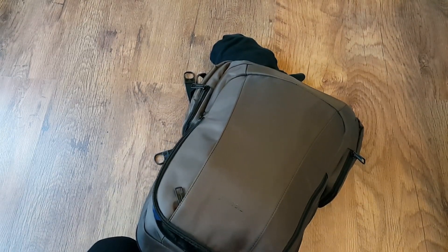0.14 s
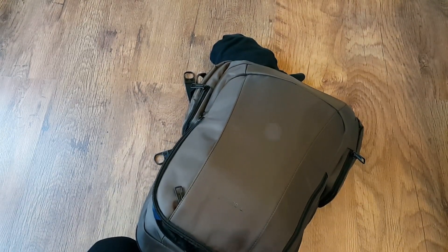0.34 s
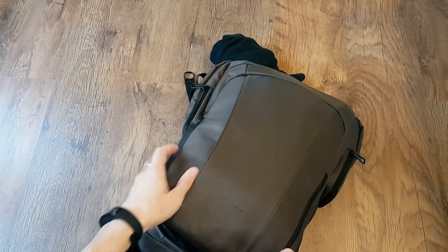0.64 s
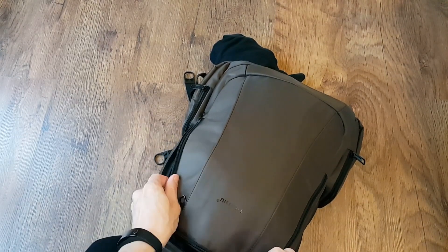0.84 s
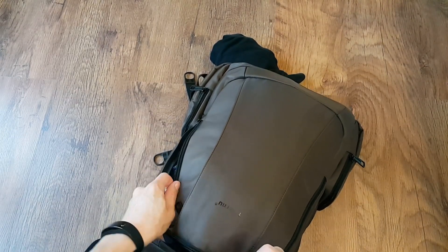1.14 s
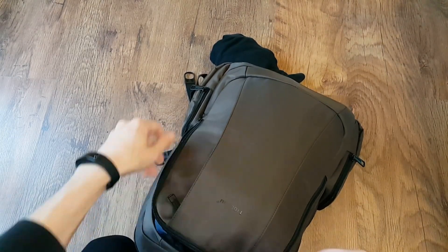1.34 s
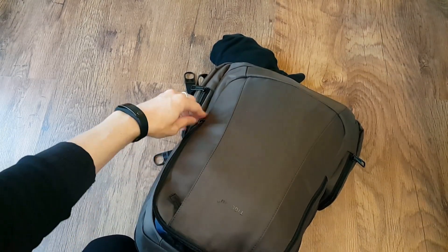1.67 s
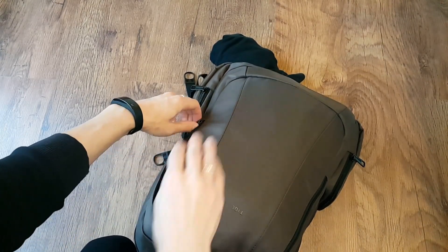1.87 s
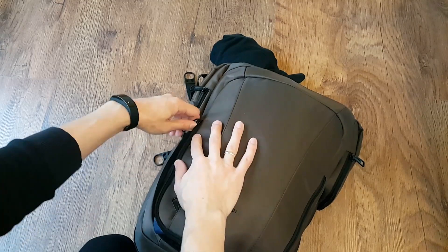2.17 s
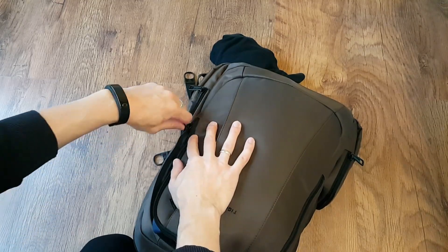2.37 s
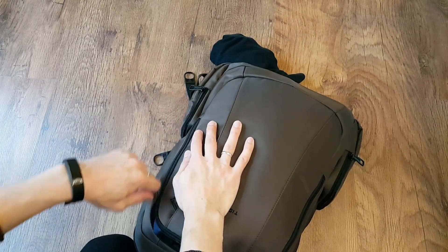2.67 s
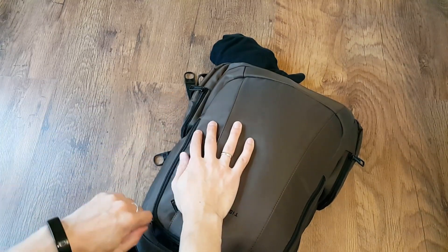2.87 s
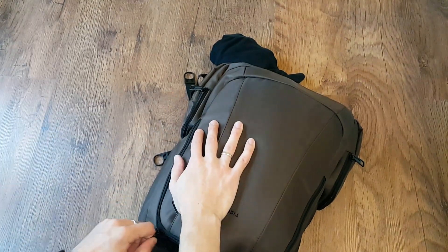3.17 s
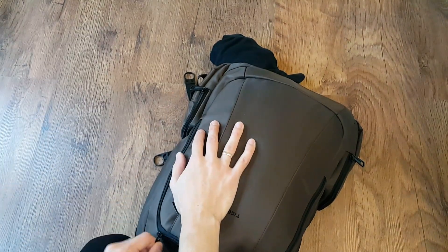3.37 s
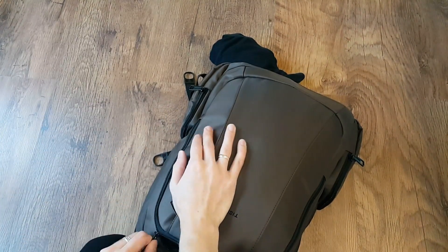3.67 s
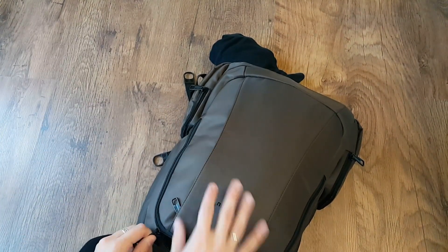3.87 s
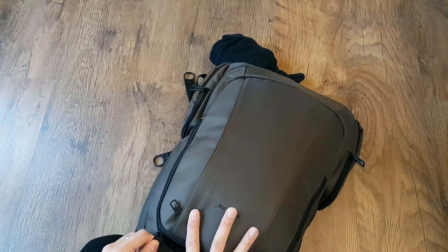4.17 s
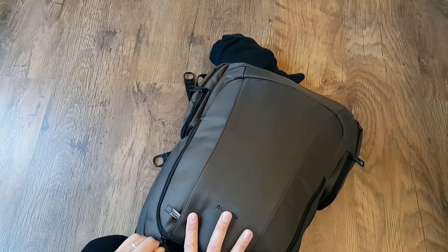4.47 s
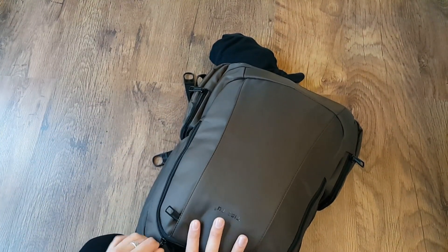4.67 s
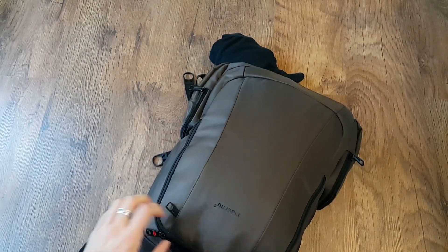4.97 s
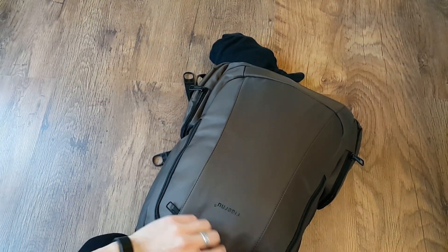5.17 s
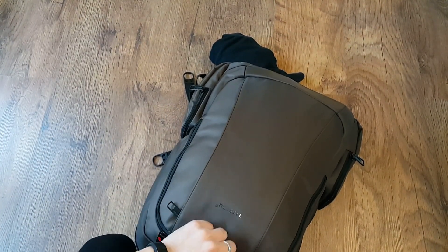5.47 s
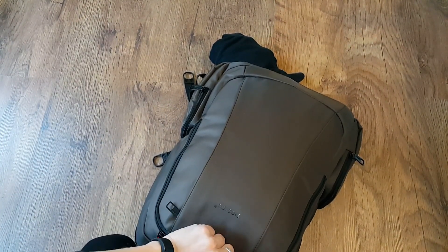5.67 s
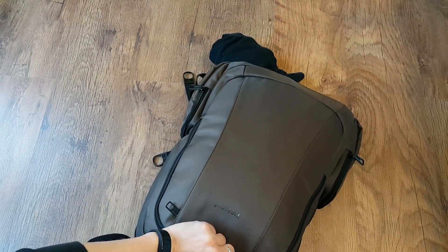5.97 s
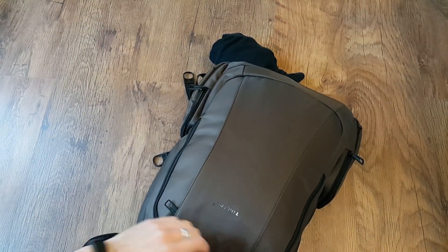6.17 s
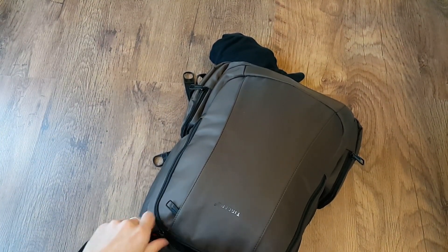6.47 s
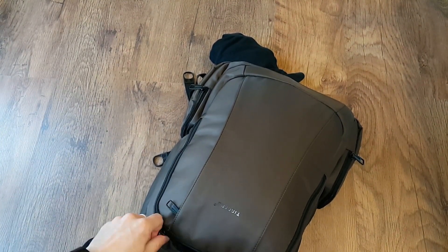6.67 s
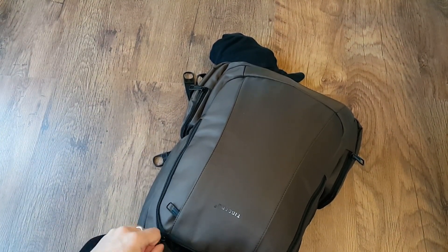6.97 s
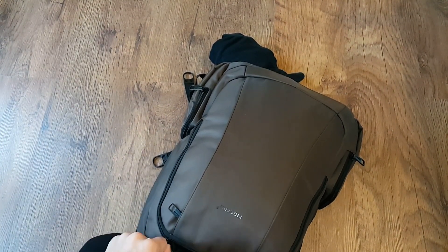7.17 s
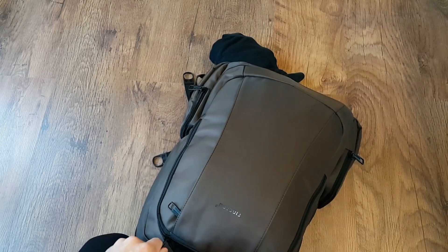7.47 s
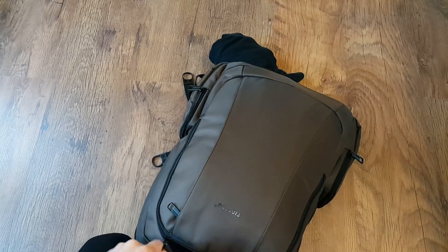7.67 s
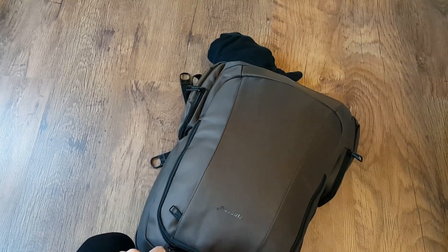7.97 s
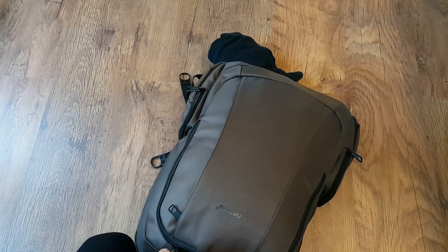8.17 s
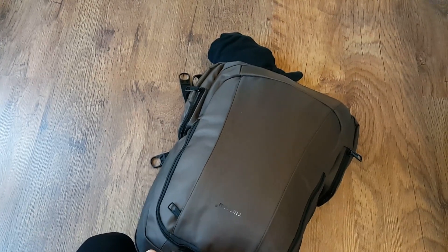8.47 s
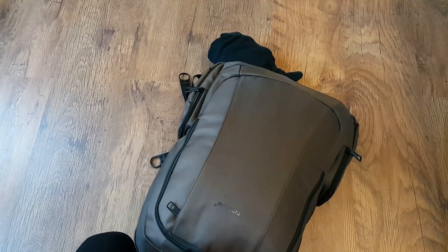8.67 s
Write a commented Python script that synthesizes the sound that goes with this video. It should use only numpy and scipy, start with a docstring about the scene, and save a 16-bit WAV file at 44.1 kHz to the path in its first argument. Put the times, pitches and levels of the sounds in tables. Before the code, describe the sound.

Hands brush and tap a full backpack, then its zipper buzzes in one quick pull and clicks shut in small halting tugs.

```python
"""Zipping a packed backpack shut

In a small room the slider advances in short tugs; one long pull buzzes in two surges, then tugs follow again.
Each tooth is a noise click that rings damped modes of panel, contents and rim, brighter the tauter the bag.
Hands brush the cloth (filtered noise) and bump its folds; pull tabs tick and jingle (clicks and modes).
One fingernail squeak (falling sine), a slap echo, diffuse reverberation and quiet air complete the scene.
"""
import sys
import numpy as np
from scipy import signal
from scipy.fft import rfft, irfft
from scipy.io import wavfile
from scipy.ndimage import uniform_filter1d

SR = 44100
rng = np.random.default_rng(int(sys.argv[2]) if len(sys.argv) > 2 else 0)


def persist_wave(psi):
    """Save psi, clipped to +-1, as 16-bit WAV."""
    counts = np.round(np.clip(psi, -1, 1) * 32767).astype(np.int16)
    wavfile.write(sys.argv[1], SR, np.atleast_2d(counts).T)


N = 389844
TIME_S = np.arange(N) / SR

# damped modes of the bag's contents: f/Hz, level/dB, t60/s
CONTENTS_MODES = [(125.8, -1.5, 0.16), (206.5, 3.5, 0.055)]
# spectrum of a tooth click: f/Hz, density/(dB per Hz)
TOOTH_SPECTRUM = [(300, -4), (1100, 4.5), (2700, -1), (3700, -4.5), (5300, -4), (7800, -17.5), (16000, -60)]
# spectrum of a fingertip or tab tick: f/Hz, density/(dB per Hz)
TAP_SPECTRUM = [(300, -30), (900, 1), (2600, 4), (4700, 3), (6500, -15), (16000, -55)]
# spectrum of a click's bright edge: f/Hz, density/(dB per Hz)
EDGE_SPECTRUM = [(2000, 2.5), (7500, -8.5), (10500, -3), (16000, -8)]
# hand sliding on the cloth: middle t/s, half length/s, relative level/dB
CLOTH_STROKES = [(0.482, 0.076, -71), (0.745, 0.0452, -65.5), (0.985, 0.08, -62), (1.647, 0.22, -73),
                 (2.266, 0.047, -62.5), (3.985, 0.042, -68), (4.205, 0.053, -67.5), (4.97, 0.14, -69),
                 (5.331, 0.057, -67), (5.446, 0.026, -62), (5.657, 0.086, -72.5), (6.328, 0.03, -69.5),
                 (6.743, 0.022, -65), (7.502, 0.029, -66)]


def from_db(db):
    """Decibels to gain."""
    return 10 ** (np.asarray(db) / 20)


def in_time(rows):
    """Columns of a curve, interpolated at every sample."""
    s, *columns = np.transpose(rows)
    return [np.interp(TIME_S, s, column) for column in columns]


def at_hz(points, hz):
    """Table value, interpolated along log frequency."""
    f, value = np.transpose(points)
    return np.interp(np.log(np.maximum(hz, 1)), np.log(f), value)


def colour(x, spectrum, size=4096):
    """Causal minimum-phase filter of unit energy with the given spectrum."""
    log_gain = np.log(from_db(at_hz(spectrum, np.fft.rfftfreq(size, 1 / SR))))
    cepstrum = irfft(log_gain)
    # fold the cepstrum onto positive time
    cepstrum[1:size // 2] *= 2
    cepstrum[size // 2 + 1:] = 0
    response = irfft(np.exp(rfft(cepstrum)))
    response /= np.linalg.norm(response)
    return signal.oaconvolve(np.atleast_2d(x), [response], axes=1)[:, :N]


def clicks(s, db):
    """One impulse per event."""
    out = np.zeros(N)
    index = np.clip(np.round(np.asarray(s) * SR).astype(int), 0, N - 1)
    np.add.at(out, index, from_db(db))
    return out


def strike(s, db, modes, spread_db, detune, pitch=1, tilt_db=0):
    """Each blow rings damped modes with random strengths and detuning; tilt_db is per octave."""
    hz, level_db, t60_s = np.transpose(modes)[:, :, None]
    t = TIME_S[:int(t60_s.max() * SR)]
    fade = from_db(level_db - 60 * t / t60_s)
    octaves = np.log2(hz) - np.log2(hz).mean()
    chance = rng.standard_normal((len(s), 2, len(hz), 1))
    blows = np.broadcast_arrays((s * SR).astype(int), db, pitch, tilt_db)
    out = np.zeros(N + len(t))
    for at, blow_db, factor, tilt, (strength, stretch) in zip(*blows, chance):
        mode_hz = hz * factor * np.exp(detune * stretch)
        gain = from_db(blow_db + tilt * octaves + spread_db * strength)
        rings = gain * fade * np.sin(2 * np.pi * mode_hz * t)
        # neighbouring modes swing in opposition
        out[at:at + len(t)] += rings[::2].sum(axis=0) - rings[1::2].sum(axis=0)
    return out[:N]


def stereo_noise(side_db):
    """White noise; side_db is the left-right difference relative to the common part."""
    mid, side = rng.standard_normal((2, N))
    return mid + from_db(side_db) * side * [[1], [-1]]


def crack(s, db, spectrum, fade_s, side_db, snap_db=-30):
    """A contact: one sharp snap plus a burst of tiny slips decaying with time constant fade_s."""
    snaps = clicks(s, db)
    power = signal.lfilter([1], [1, -np.exp(-2 / (fade_s * SR))], snaps ** 2 + 1e-24)
    slips = np.sqrt(power) * stereo_noise(side_db)
    snap_gain = from_db(snap_db) * np.sqrt(fade_s * SR / 2)
    return colour(slips + snap_gain * snaps, spectrum)


def bag(s, panel_db, thump_db, rim_db, spread_db):
    """A jolt rings the panel, brighter the tauter it is, thumps the contents and reaches the stiff rim."""
    # front panel modes: f/Hz, level/dB, t60/s
    panel_modes = [(307, 1.5, 0.073), (431, 2.5, 0.04), (590, 2, 0.036), (783, -2, 0.027)]
    # stiff rim modes: f/Hz, level/dB, t60/s
    rim_modes = [(1051, -0.5, 0.013), (1266, 1, 0.0077)]
    taut_tilt = 0.12  # dB per octave for each dB of rim over thump
    tilt_db = taut_tilt * (rim_db - thump_db)
    panel = strike(s, panel_db, panel_modes, spread_db, detune=0.058, tilt_db=tilt_db)
    thump = strike(s, thump_db, CONTENTS_MODES, spread_db, detune=0.13)
    rim = strike(s, rim_db, rim_modes, spread_db, detune=0.11)
    return panel + thump + rim


def slack_bag(s, db):
    """A light touch on the bag while nothing stretches it: fixed thump and rim relative to the panel."""
    return bag(s, db, thump_db=db - 2.5, rim_db=db + 3, spread_db=3.5)


def air():
    """The room's quiet air: steady coloured noise."""
    # air spectrum: f/Hz, density/(dB per Hz)
    air_spectrum = [(25, -24), (55, -6.5), (125, -7.5), (400, -8.5), (800, -16.5), (5000, -27), (8000, -35),
                    (15000, -30.5)]
    return from_db(-68) * colour(stereo_noise(side_db=-4.0), air_spectrum)


def tug_teeth():
    """Each tug drags a few near-evenly spaced teeth: t/s, click, panel, thump, rim level/dB, first 0 or 1."""
    # tugs: start t/s, first to last tooth/s, teeth, then relative click, panel, thump, rim level/dB
    tug_rows = [(0.0122, 0.036, 3, -40, -46.5, -46.5, -42), (0.0695, 0, 1, -37.5, -43, -60, -38),
                (3.0739, 0.007, 2, -39, -51, -57, -32.5), (3.0956, 0.016, 3, -43.5, -47.5, -53, -34),
                (3.121, 0.022, 3, -39, -43.5, -53, -33.5), (3.157, 0, 1, -42, -52, -54, -48),
                (3.2680, 0, 1, -42, -55.5, -52, -39), (3.3650, 0.039, 6, -36, -40.5, -47, -40.5),
                (3.5886, 0.033, 3, -42.5, -46.5, -50, -43.5), (4.0870, 0, 1, -42.5, -48.5, -56, -40.5),
                (4.156, 0.016, 2, -44, -52.5, -51.5, -47), (4.3177, 0.025, 3, -40.5, -42.5, -49, -49),
                (4.6298, 0, 1, -43, -45.5, -48, -39), (4.6881, 0.035, 3, -42, -42, -49, -43.5),
                (5.9066, 0, 1, -53, -52, -62, -52), (5.929, 0.048, 6, -46.5, -42.5, -73, -41.5),
                (6.1096, 0, 1, -47, -44.5, -61, -43), (6.128, 0.047, 6, -42.5, -38, -55, -38),
                (6.3547, 0, 1, -45, -43.5, -55, -46), (7.1153, 0, 1, -40.5, -47.5, -45, -71),
                (7.238, 0, 1, -44, -48.5, -47.5, -57), (7.3417, 0.0082, 2, -38, -44, -50, -72),
                (7.386, 0, 1, -44, -41, -46.5, -44), (7.695, 0.016, 2, -42.5, -41.5, -44, -42),
                (7.7718, 0, 1, -49.5, -45.5, -42, -48), (7.9439, 0, 1, -39.5, -46, -45, -55),
                (7.9782, 0, 1, -37, -47.5, -47.5, -42), (8.1658, 0.012, 3, -43, -46.5, -47, -39),
                (8.2947, 0.030, 3, -44, -42.5, -46.5, -48), (8.4093, 0, 1, -41, -44, -52.5, -55),
                (8.5184, 0.026, 4, -37.5, -42.5, -49, -51), (8.707, 0, 1, -39, -40.5, -52, -46),
                (8.74, 0.012, 2, -41, -44.5, -50.5, -49)]
    jitter, uneven_db = .05, 3.5  # share of the tooth spacing; spread of strength after the first tooth
    rows = []
    for start, length, teeth, *levels_db in tug_rows:
        gaps = int(round(teeth)) - 1
        for k in range(gaps + 1):
            spread = [jitter * (0 < k < gaps), uneven_db * (k > 0)]
            late, size_db = rng.standard_normal(2) * spread
            s = start + length * (k + late) / max(gaps, 1)
            rows.append((s, *np.add(levels_db, size_db), k == 0))
    return rows


def tugs():
    """The slider jumps from tooth to tooth; its metal rings a little differently at each."""
    # slider modes: f/Hz, level/dB, t60/s
    slider_modes = [(2598, -4, 0.025), (3200, 4, 0.011), (4720, -11.5, 0.037), (5360, -17.5, .09)]
    ring_db, break_free_db = -12, 4  # ring relative to click; extra edge as the first tooth breaks free
    s, click_db, panel_db, thump_db, rim_db, first = np.transpose(tug_teeth())
    edge_db = click_db + break_free_db * first
    teeth = from_db(-5) * crack(s, click_db, TOOTH_SPECTRUM, fade_s=0.0033, side_db=-3.5, snap_db=-1.5)
    edge = from_db(-8) * crack(s, edge_db, EDGE_SPECTRUM, fade_s=0.00079, side_db=2.0)
    ring = strike(s, click_db + ring_db, slider_modes, spread_db=4, detune=0.04)
    return teeth + edge + ring + bag(s, panel_db, thump_db, rim_db, spread_db=3.0)


def taps():
    """Tabs and fingertips land on the slack bag with a short, hard tick."""
    # taps: t/s, relative click level/dB, treble level/dB, panel level/dB
    tap_rows = [(0.3635, -56.5, -62, -55.5), (0.6346, -55, -59.5, -54.5), (0.9073, -55.5, -80, -45.5),
                (1.1364, -39.5, -56, -45.5), (1.1703, -36, -54.5, -43.5), (1.29, -44.5, -60, -46),
                (1.3683, -44, -54, -56.5), (1.4803, -69, -71, -52), (1.558, -58, -61, -57),
                (1.62, -62, -56, -51), (1.724, -66, -58, -72), (1.86, -48, -57, -48.5),
                (1.941, -51, -47.5, -44.5), (1.970, -59, -52, -48), (2.127, -56, -63.5, -52.5),
                (2.22, -63, -66, -50.5), (2.2509, -54, -52, -47.5), (2.4211, -55, -69, -56),
                (5.196, -58, -48, -52), (5.3194, -60, -43, -50.5), (5.4294, -55, -47.5, -56.5),
                (5.819, -72, -83, -56), (6.687, -62, -66, -51), (6.833, -61, -49.5, -51),
                (7.506, -63, -71, -48)]
    s, click_db, treble_db, panel_db = np.transpose(tap_rows)
    tick = from_db(6.5) * crack(s, click_db, TAP_SPECTRUM, fade_s=.0009, side_db=-5, snap_db=-1.5)
    edge = from_db(4.5) * crack(s, treble_db, EDGE_SPECTRUM, fade_s=0.0038, side_db=0.0)
    return tick + edge + slack_bag(s, panel_db)


def bumps(below_db=3):
    """Sliding fingers bump softly over folds at random moments of each stroke."""
    bumps_per_s, bump_db = 20, 3.5  # rate over the stroke; level relative to its table entry
    events = []
    for middle, half, level_db in CLOTH_STROKES:
        for _ in range(int(np.ceil(2 * half * bumps_per_s))):
            events.append((middle + half * rng.uniform(-1.5, 1), level_db + bump_db))
    s, db = np.transpose(events)
    contact = crack(s, db - below_db, TAP_SPECTRUM, fade_s=0.0012, side_db=14)
    return slack_bag(s, db) + contact


def cloth(grain_db=5.5, grains_per_s=500):
    """Each stroke swells, holds and fades; skin catches on the weave in a fine, uneven hiss."""
    # cloth spectrum: f/Hz, density/(dB per Hz)
    cloth_spectrum = [(60, -25), (130, 10.5), (400, 10.5), (900, 6.5), (2800, 2), (5000, -2), (8000, -11.5),
                      (16000, -9)]
    power = 0
    for middle, half, db in CLOTH_STROKES:
        power = power + from_db(db) ** 2 * np.exp(-np.minimum(((TIME_S - middle) / half) ** 4, 50))
    weave = np.interp(TIME_S * grains_per_s, np.arange(N), rng.standard_normal(N))
    grain = from_db(grain_db * weave + 4.0)
    return colour(np.sqrt(power) * grain * stereo_noise(side_db=-6.5), cloth_spectrum)


def jingles(bounce_s=0.011, fade_db=7, count=4):
    """A metal tab swinging against the slider clatters a few times, ever more lightly."""
    # jingles: t/s, relative level/dB, mode tilt/(dB per octave)
    jingle_rows = [(1.615, -51, 0), (5.457, -62, -7), (6.842, -62, -2)]
    # metal tab modes: f/Hz, level/dB, t60/s
    tab_modes = [(5050, -4, .06), (11290, 0, .055), (13540, -8, .035)]
    s, db, tilt_db = np.transpose(jingle_rows)[:, :, None]
    # first contact at 0, the others at random within bounce_s
    progress = np.sort(rng.random((len(s), count))) * (np.arange(count) > 0)
    s = (s + bounce_s * progress).ravel()
    db = (db - fade_db * progress).ravel()
    tilt_db = np.repeat(tilt_db, count)
    ring = strike(s, db, tab_modes, spread_db=2, detune=0.004, tilt_db=tilt_db)
    return ring + crack(s, db - 3, TOOTH_SPECTRUM, fade_s=0.0087, side_db=-0.5)


def long_pull(first_echo_s=0.0014, echo_growth_per_s=3.5, brightening_db=14, echo_db=-4.0):
    """One click a tooth: the rattle twice rises to a buzz with slider speed, then runs down."""
    # slider speed: t/s, speed/(teeth per s)
    speed_rows = [(2.48, 90), (2.6, 185), (2.672, 128), (2.695, 250), (2.715, 420), (2.73, 462),
                  (2.76, 360), (2.815, 190), (2.832, 138), (2.86, 195), (2.88, 380), (2.922, 515),
                  (2.945, 430), (2.965, 290), (3.005, 105), (3.06, 65)]
    # pull: t/s, force on panel/dB, click strength/dB, panel resonance under the slider f/Hz
    pull_rows = [(2.48, -35, -4, 500), (2.55, -9, -10.5, 624), (2.655, -6, -4, 645), (2.675, 1, -8, 720),
                 (2.73, -1, 0, 685), (2.815, -5, -3.5, 574), (2.865, 3.5, 2, 610), (2.89, -3.5, -2, 566),
                 (2.93, 2.5, -1, 490), (2.975, -2, 2.5, 370), (3.06, -2.5, -2.5, 325)]
    zip_modes = [(265, 2, 0.017), (665, 15.0, 0.014), (1780, -3, 0.009)]  # before tuning: f/Hz, level/dB, t60/s
    slow_teeth_per_s, slow_panel_db, slow_click_db = 62, -45.5, -57  # one slow tooth at 0 dB in the pull curve
    panel_db_per_decade, click_db_per_decade = -11, -3  # for ten times the speed
    # scatter is full below this speed: share of tooth spacing; strength
    catching_teeth_per_s, catch_jitter, catch_uneven_db = 130, .11, 2.8

    speed, = in_time(speed_rows)
    start, end = speed_rows[0][0], speed_rows[-1][0]
    travel_teeth = np.cumsum(speed * (TIME_S > start) * (TIME_S < end)) / SR
    at = np.flatnonzero(np.diff(np.floor(travel_teeth)))
    tooth_speed = speed[at]

    # slow teeth catch unevenly; fast ones run smoothly
    catching = np.minimum(catching_teeth_per_s / tooth_speed, 1)
    shift, size = rng.standard_normal((len(at), 2)).T * catching
    s = TIME_S[at] + catch_jitter * shift / tooth_speed
    uneven_db = catch_uneven_db * size

    # the faster the teeth pass, the lighter and brighter each one strikes
    haste = np.log10(tooth_speed / slow_teeth_per_s)
    force_db, bite_db, panel_hz = (curve[at] for curve in in_time(pull_rows))
    panel_db = slow_panel_db + force_db + panel_db_per_decade * haste + uneven_db
    click_db = slow_click_db + bite_db + click_db_per_decade * haste + uneven_db

    # the middle mode is tuned to the panel resonance
    pitch = panel_hz / zip_modes[1][0]
    body = strike(s, panel_db, zip_modes, spread_db=1, detune=0.02, pitch=pitch)
    # the heavy contents cannot follow fast teeth
    thump = from_db(1.5) * strike(s, panel_db - 9 * haste, CONTENTS_MODES[1:], spread_db=0, detune=0.039)
    teeth = from_db(3) * crack(s, click_db, TOOTH_SPECTRUM, fade_s=0.0014, side_db=-1, snap_db=8)
    edge = crack(s, click_db + brightening_db * haste, EDGE_SPECTRUM, fade_s=0.00089, side_db=0)

    # each click returns along a lengthening stretch of tape, so its overtones sweep downwards
    echo_s = first_echo_s * np.exp(echo_growth_per_s * np.clip(TIME_S - start, 0, 1))
    returned = np.array([np.interp(TIME_S - echo_s, TIME_S, side) for side in teeth])
    return body + thump + teeth + edge + from_db(echo_db) * returned


def swish():
    """A fingernail slowing over the ribbed weave gives a short, rough, falling squeak."""
    middle_s, half_s, level_db = 5.276, .014, -56
    middle_hz, fall_per_s, rough = 2650, 13.5, .035  # exponential fall rate; pitch wobble as a share
    t = np.clip(TIME_S - middle_s, -.5, .5)
    smooth_noise = uniform_filter1d(rng.standard_normal((2, N)), size=60)
    wobble, grip = (w / w.std() for w in smooth_noise)
    hz = middle_hz * np.exp(-fall_per_s * t) * (1 + rough * wobble)
    envelope = from_db(level_db + 2 * grip) * np.exp(-(t / half_s) ** 2)
    return envelope * np.sin(2 * np.pi * np.cumsum(hz) / SR)


def place(near):
    """The arrival-time difference between the channels follows the hands; a slight level difference is fixed."""
    # lead of the left channel: t/s, lead/s
    lead_rows = [(1.2, 0), (3, 9e-5), (4.8, 9e-5), (5.2, -2e-5), (6.2, -4e-5), (6.5, 9e-5)]
    pan_db = -0.26  # left minus right
    lead_s, = in_time(lead_rows)
    right = np.interp(TIME_S - lead_s, TIME_S, near[1])
    return np.array([near[0], right]) * from_db([[pan_db / 2], [-pan_db / 2]])


def slap(near, delay_s=.00678):
    """A hard surface nearby returns one delayed copy."""
    # echo: left level/dB, right level/dB
    slap_db = [-14.5, -21.5]
    return from_db(slap_db)[:, None] * np.interp(TIME_S - delay_s, TIME_S, near.mean(axis=0))


def room(x, wet, likeness, gap_s=0.0011, count=10):
    """Diffuse reflections, dying band by band and alike in both channels in the bass."""
    # room decay: f/Hz, t60/s
    decay_rows = [(120, 0.2), (1000, 0.21), (6000, 0.21), (14000, 0.13)]
    t = TIME_S[:SR * 2 // 3]
    onset = np.clip(t / gap_s - 1, 0, 1)
    edges_hz, tail = np.geomspace(50, 18000, count + 1), 0
    for low, high in zip(edges_hz, edges_hz[1:]):
        hz = np.sqrt(low * high)
        fade = from_db(-60 * t / at_hz(decay_rows, hz)) * onset
        sos = signal.butter(2, [low, high], "band", fs=SR, output="sos")
        band = signal.sosfilt(sos, rng.standard_normal((2, len(t))) * fade)
        # energy in proportion to bandwidth
        band *= np.sqrt((high - low) / SR) / np.linalg.norm(band, axis=1, keepdims=True)
        mid, side = band
        alike = np.clip(at_hz(likeness, hz), -1, 1)
        stereo = np.sqrt(1 + alike) * mid + np.sqrt(1 - alike) * side * [[1], [-1]]
        tail = tail + from_db(at_hz(wet, hz)) * stereo
    return signal.oaconvolve(x.mean(axis=0, keepdims=True), tail, axes=1)[:, :N]


def moving_room(x, count=3):
    """Hands and body keep moving, so the pattern of reflections passes from one to the next."""
    wet = [(130, -6.0), (450, -1.5), (1500, 0), (5000, -0.5), (12000, 3.0)]  # f/Hz, level/dB
    likeness = [(130, 0.96), (350, 0.84), (800, 0.22), (4000, 0.014)]  # f/Hz, left-right correlation
    phase = TIME_S / 2 + np.arange(count)[:, None] / count
    shares = np.cos(np.pi * phase) * np.sqrt(2 / count)
    return sum(room(x * share, wet, likeness) for share in shares)


def scene():
    """Handling sounds, placed by arrival time, echo in the room; squeak and air are added without echo."""
    tap_dryness = .3  # share of the taps kept out of the reverberation
    ticks = taps()
    near = tugs() + ticks + bumps() + cloth() + jingles() + long_pull()
    echo = moving_room(near - tap_dryness * ticks)
    return place(near) + slap(near) + swish() + echo + air()


def record(dry):
    """The microphone sheds the deep bass; the top is cut steeply."""
    low_cut = signal.butter(2, 56, "high", fs=SR, output="sos")
    top_cut = signal.ellip(10, .1, 70, 15900, fs=SR, output="sos")  # ripple/dB, stopband/dB, cutoff/Hz
    return signal.sosfilt(top_cut, signal.sosfilt(low_cut, dry))


dry = scene()
out = record(dry)
persist_wave(out)
```